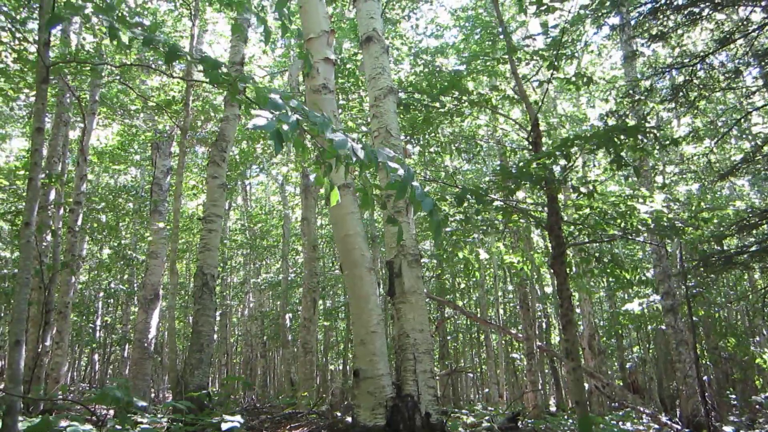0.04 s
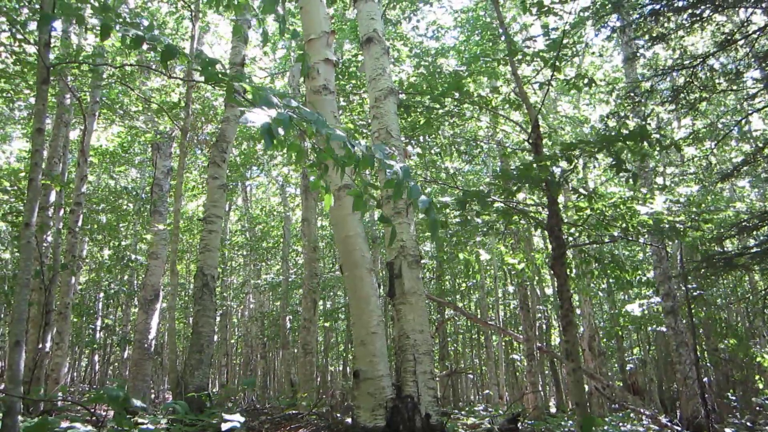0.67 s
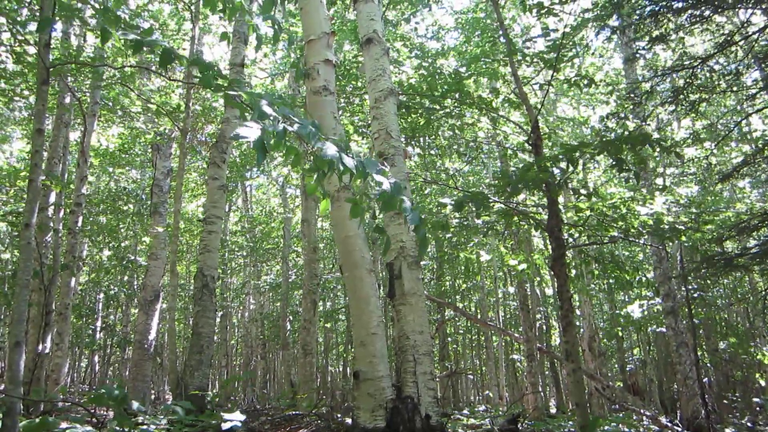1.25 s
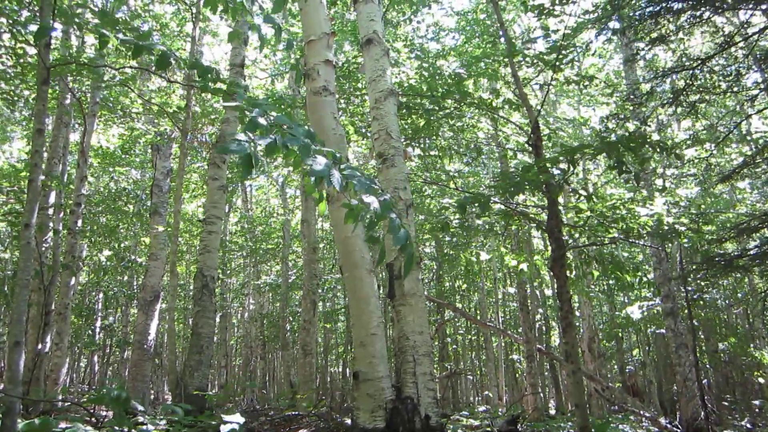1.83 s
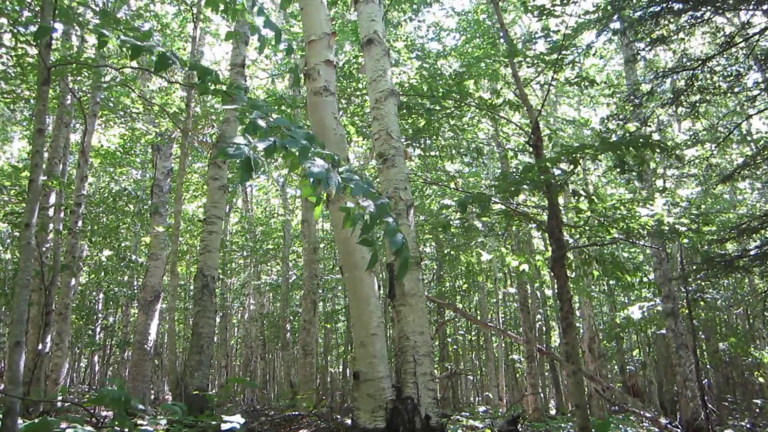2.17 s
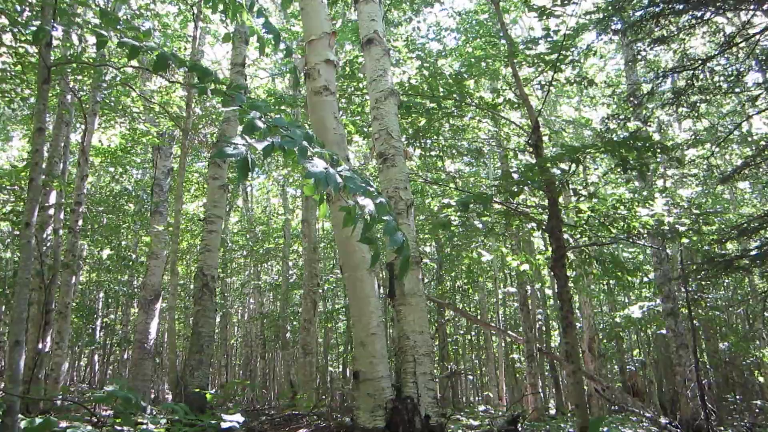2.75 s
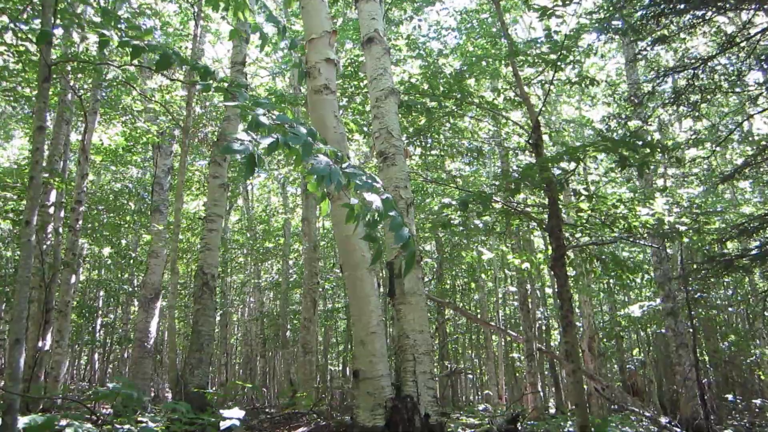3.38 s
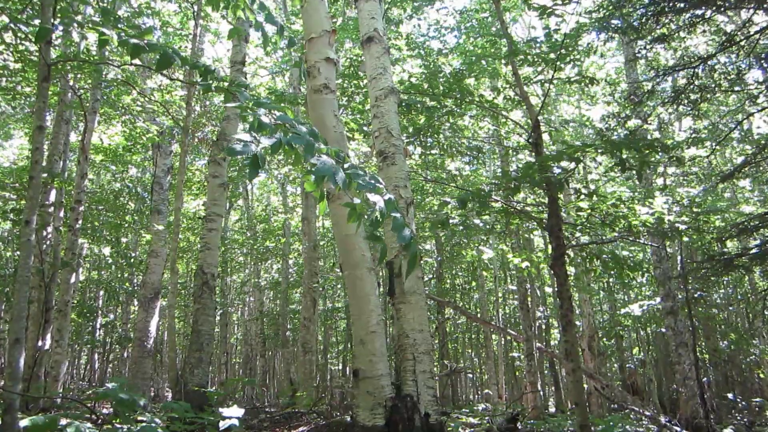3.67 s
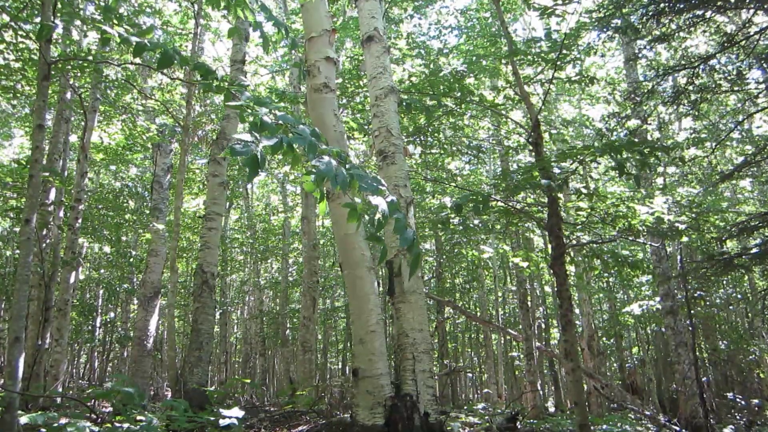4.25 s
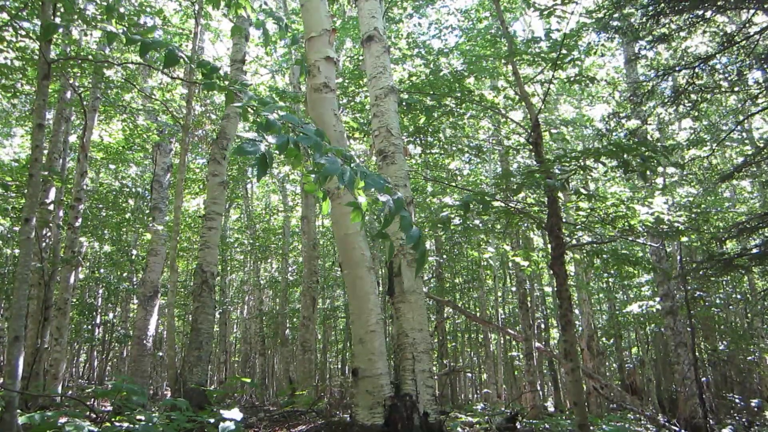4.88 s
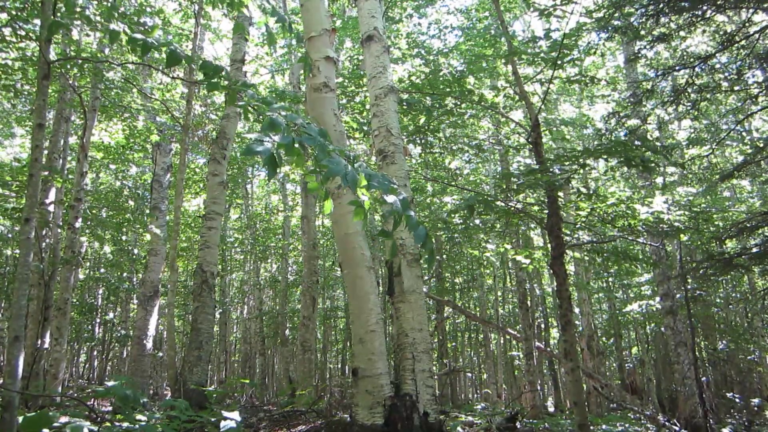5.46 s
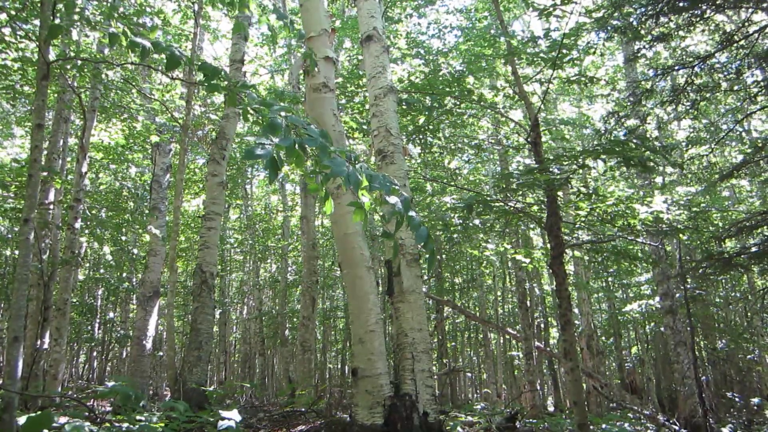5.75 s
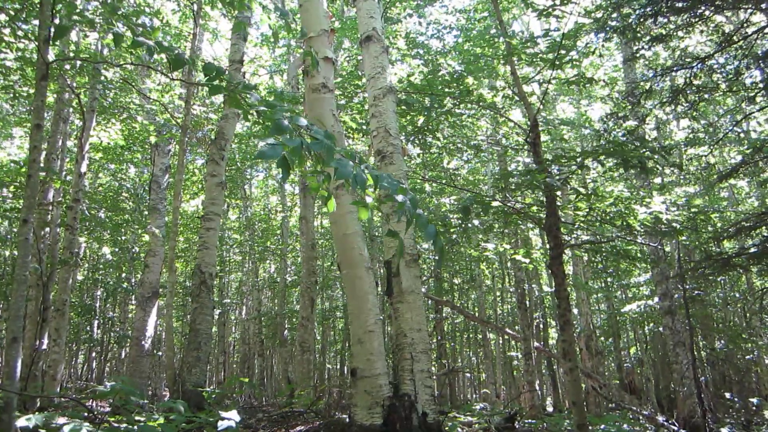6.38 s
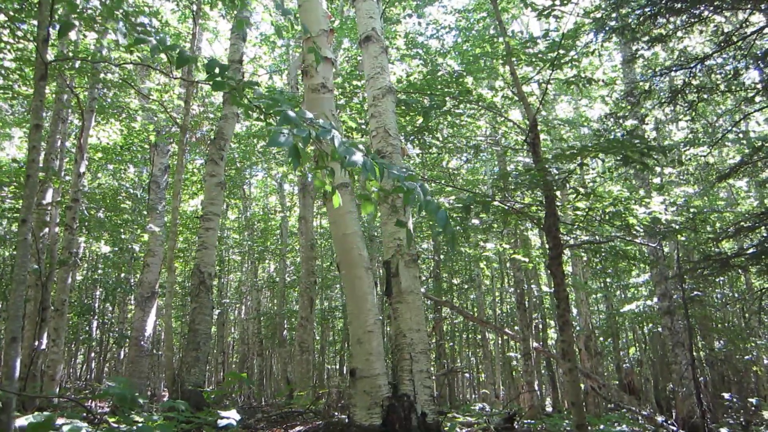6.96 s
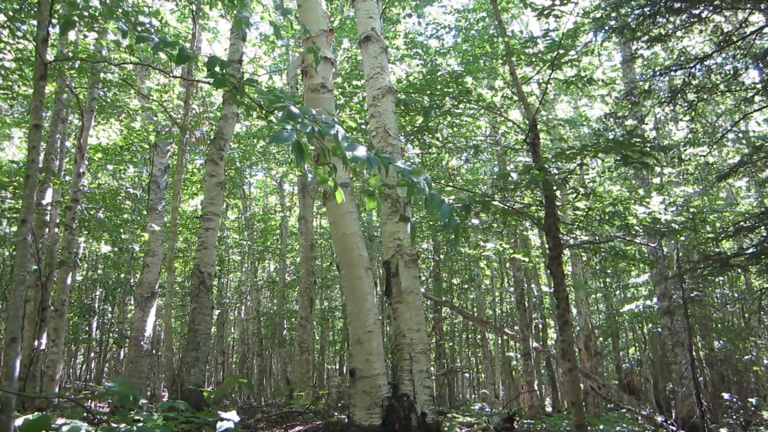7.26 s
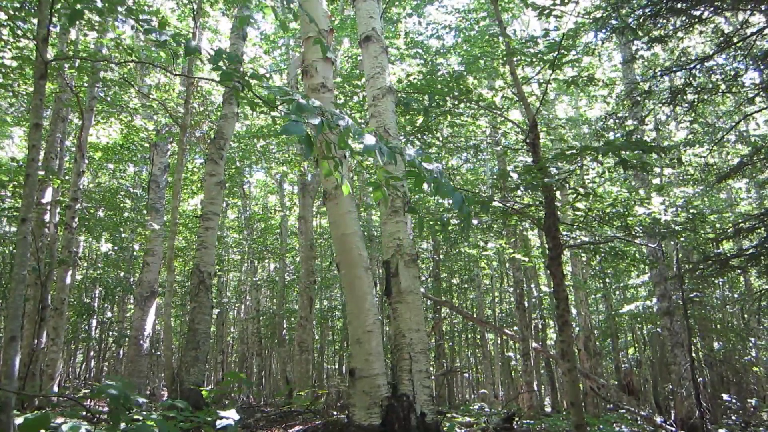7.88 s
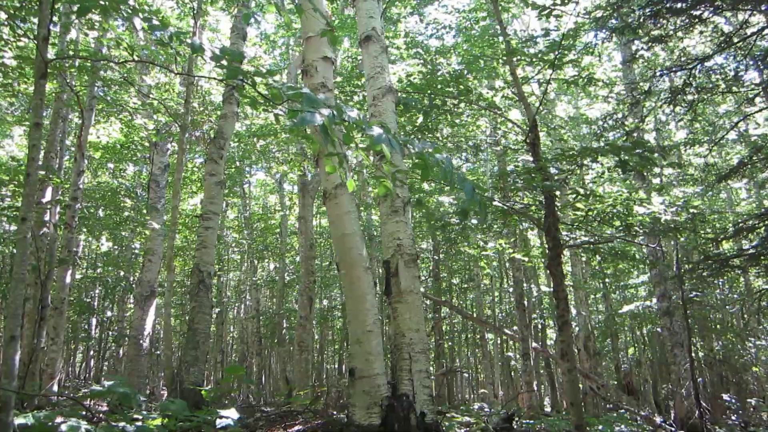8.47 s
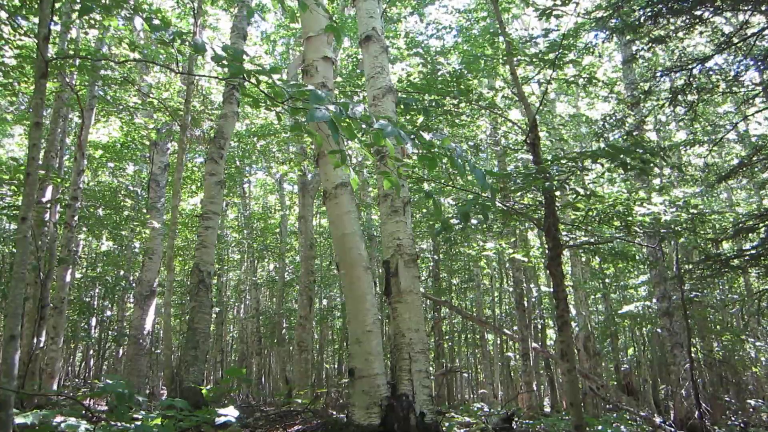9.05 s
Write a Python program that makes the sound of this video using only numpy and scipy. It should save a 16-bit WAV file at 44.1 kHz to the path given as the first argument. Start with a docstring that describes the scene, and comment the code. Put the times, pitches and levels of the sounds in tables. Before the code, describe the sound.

A gust rumbles and slaps against the microphone in a forest, easing off to leave softly rustling leaves.

```python
"""Wind in a summer birch wood

Steady leaf hiss and a faint camera whine sink as the recorder turns its gain down under a gust,
then return. For about six seconds the gust buffets the microphone: each passing eddy is a soft
pressure slap, short and hard in fast air, long and dull as the gust dies.
Two of the hardest slaps overload the input with a tick."""
import sys
import numpy as np
from scipy import signal
from scipy.fft import rfft, irfft
from scipy.io import wavfile
from scipy.ndimage import uniform_filter1d

SR = 44100
rng = np.random.default_rng(int(sys.argv[2]) if len(sys.argv) > 2 else 0)


def file_out(sig):
    """Save sig as 16-bit WAV at sys.argv[1]."""
    # one column per channel
    cols = np.atleast_2d(sig).T
    # limit, then scale
    lim = np.clip(cols, -1, 1)
    pcm = np.round(lim * 32767).astype(np.int16)
    wavfile.write(sys.argv[1], SR, pcm)


N = 406602

# base level of leaves and whine, drawn as the recorder's gain dips and returns: (time [s], level [dB])
HISS_LEVEL = [(0, -51.5), (0.33, -50.6), (0.53, -55.5), (0.8, -54), (0.9, -57), (1.25, -57.5),
              (1.55, -56.5), (2.0, -56), (2.7, -58), (3.08, -56), (3.35, -59), (3.8, -59), (4.6, -56.5),
              (5.2, -53.8), (5.55, -54.2), (6.1, -51.6), (6.6, -49), (9.22, -48.5)]


def from_db(db):
    """Decibels to gain."""
    return 10 ** (np.asarray(db) / 20)


def rms_one(x):
    """Scale to unit power."""
    return x / np.sqrt(np.mean(x ** 2) + 1e-20)


def envelopes(rows):
    """One sample-by-sample curve for each column after the time."""
    times, *columns = np.transpose(rows)
    return [np.interp(np.arange(N) / SR, times, column) for column in columns]


def cut(x, hz, kind, order=2):
    """Butterworth low- or high-pass."""
    return signal.sosfilt(signal.butter(order, hz, kind, fs=SR, output="sos"), x)


def coloured(x, spectrum):
    """Shape a white signal with an EQ curve; rms 1."""
    hz, db = np.transpose(spectrum)
    bin_hz = np.maximum(np.arange(N // 2 + 1) * SR / N, 1)
    eq_db = np.interp(np.log(bin_hz), np.log(hz), db, left=-99, right=-99)
    return rms_one(irfft(rfft(x) * from_db(eq_db), N))


def drift(per_s):
    """A wobble that glides between random values; rms 1."""
    steps = rng.standard_normal(4096)
    return rms_one(np.interp(np.arange(N) / SR * per_s, np.arange(len(steps)), steps))


def leaf_contacts(per_s, spread_db):
    """Leaves touch at random, most of them faintly; rms 1."""
    sizes = from_db(spread_db * rng.standard_normal(N)) * rng.standard_normal(N)
    return rms_one(sizes * (rng.random(N) < per_s / SR))


def forest(roar_db=2.5, rustle_db=1.5, sizzle_start_db=-8.5, sizzle_end_db=-12.6, settle_s=3.5):
    """Far crowns merge into a smooth roar; nearer leaves keep a fine grain whose sizzle slowly dulls."""
    # EQ of the far roar, the leaf rustle and its sizzle: (frequency [Hz], relative level [dB])
    roar_eq = [(20, -13), (60, -1), (150, 0), (260, 0.5), (360, -1.5), (510, 1.5), (650, -2), (900, -1.5),
               (1300, -7), (2000, -15.5), (3500, -33)]
    rustle_eq = [(500, -18), (1000, -2), (1500, -1.5), (2200, -1), (3300, -1.5), (4200, -4), (5300, -7.5),
                 (6900, -13), (9000, -27), (15000, -39.5)]
    sizzle_eq = [(3500, -12.5), (5500, 1.5), (7500, 2), (9000, -0.5), (11000, -5), (13500, -10),
                 (16000, -15)]
    hiss_db, = envelopes(HISS_LEVEL)
    sizzle_db = sizzle_end_db + (sizzle_start_db - sizzle_end_db) * np.exp(-np.arange(N) / SR / settle_s)
    fine_grain = leaf_contacts(per_s=38000, spread_db=1.5)
    coarse_grain = leaf_contacts(per_s=30000, spread_db=2.0)
    roar = from_db(roar_db) * coloured(rng.standard_normal(N), roar_eq)
    rustle = from_db(rustle_db + .38 * drift(per_s=25)) * coloured(fine_grain, rustle_eq)
    sizzle = from_db(sizzle_db + .35 * drift(per_s=40)) * coloured(coarse_grain, sizzle_eq)
    return from_db(hiss_db) * (roar + rustle + sizzle)


def bumps(rows):
    """Sum of bell-shaped swings in dB, their lengths taken at half height."""
    t = np.arange(N) / SR
    return sum(db * 2 ** -((2 * (t - s) / length) ** 2) for s, length, db in rows)


def airflow(centre_follows=.18, rumble_follows=.35):
    """The gust at the microphone: puffs make it louder and faster, lulls softer and slower."""
    # buffeting, whose centre rises with air speed: (time [s], level [dB], centre [Hz])
    gust = [(0, -35, 140.1), (0.22, -26, 165), (0.5, -18, 238.1), (1.05, -21.5, 212.1), (2.0, -21.5, 176.1),
            (2.35, -21, 189.8), (2.85, -23, 188.2), (3.45, -21.5, 220), (3.9, -23.5, 199.8),
            (4.7, -23.5, 182), (5.1, -24, 156.3), (6.05, -25.5, 143), (6.5, -35.5, 108.1),
            (6.85, -47, 68.05), (7.35, -39.5, 66), (7.8, -60, 59.9), (8.9, -61, 60), (9.22, -49.5, 71.1)]
    # rumble of the largest swirls: (time [s], level [dB])
    swirls = [(0, -30.5), (0.5, -44), (4.6, -47.5), (5.6, -39), (6.3, -35.5), (6.8, -48), (7.4, -42),
              (8.1, -59), (8.6, -59), (9.22, -46)]
    # short pushes of air: (time [s], length [s], lift [dB])
    puffs = [(0.07, 0.052, 4), (0.94, 0.0797, 2.5), (1.41, 0.092, 4), (2.04, 0.0602, 2), (2.76, 0.03993, 5),
             (5.03, 0.042, 4), (5.31, 0.081, 6), (6.25, 0.051, 3.5), (6.6, 0.0907, 9), (7.29, 0.063, 10),
             (7.59, 0.038, 13), (9.15, 0.046, 10.5)]
    # moments of slack air: (time [s], length [s], depth [dB])
    lulls = [(0.635, .06, 8), (0.745, .11, 11), (1.28, 0.064, 4), (1.8, .15, 10), (2.13, 0.041, 5),
             (2.52, .06, 5), (2.69, 0.079, 11), (2.83, 0.037, 6), (4.55, 0.061, 8), (4.96, 0.083, 8),
             (5.09, .05, 8.5), (5.22, .06, 5.5), (5.46, 0.05004, 5), (6.16, .08, 8), (6.42, 0.1003, 5),
             (6.69, 0.055, 8), (7.51, 0.059, 8)]
    level_db, centre_hz = envelopes(gust)
    rumble_db, = envelopes(swirls)
    swing_db = bumps(puffs) - bumps(lulls)
    speed_ratio = from_db(centre_follows * swing_db)
    return level_db + swing_db, centre_hz * speed_ratio, rumble_db + rumble_follows * swing_db


def eddies(times, sizes, widths, leans, order, halo=3.05):
    """Passing vortices: a push ahead, suction in the core, a broad overpressure around it."""
    pressure = np.zeros(N)
    for s, size, width, lean in zip(times, sizes, widths, leans):
        span = np.arange(max(int((s - 12 * width) * SR), 0), min(int((s + 12 * width) * SR), N))
        offset = (span / SR - s) / width
        fade = np.cos(offset * np.pi / 24) ** 2
        # a higher order rounds the core into a bell, so the top end falls more steeply
        core, around = (1 + np.array([offset, offset / halo]) ** 2 / order) ** (-2 * order)
        # the overpressure balances the suction, so little deep bass is left
        pulse = around / halo - (1 + lean * offset) * core
        pressure[span] += size * fade * pulse / np.hypot(.7, lean / 2.6)
    return pressure


def buffeting(level_db, centre_hz, per_cycle=1.3, width_cycles=.33, spread_db=4.0, count=4000):
    """Faster air brings more and shorter eddies; the microphone port leaks their slowest part."""
    width_draw, size_draw, lean_draw = np.clip(rng.standard_normal((count, 3)), -1.8, 1.8).T
    passed = np.cumsum(per_cycle * centre_hz) / SR   # eddies carried past so far
    places = np.cumsum(rng.gamma(2, .5, count))
    times = np.interp(places, passed, np.arange(N) / SR, right=N / SR + 1)
    widths = width_cycles / np.interp(places, passed, centre_hz) * np.exp(.37 * width_draw)
    sizes = from_db(spread_db * size_draw)
    leans = 1.35 + 1.28 * lean_draw
    air = cut(eddies(times, sizes, widths, leans, order=4), hz=24, kind="high")
    running_power = uniform_filter1d(uniform_filter1d(air ** 2, size=2000), size=1200)
    return from_db(level_db) * air / np.sqrt(running_power + 1e-6)


def slaps(duck_depth=.75, port_hz=25):
    """The hardest eddies, and a gain that ducks the rest of the gust around each one."""
    # eddies hitting the microphone: (time [s], level [dB], half width [s])
    hits = [(0.055, -12.5, 0.0018), (0.1372, -12.5, 0.0021), (0.1983, -10, 0.0025), (0.2295, -7, .0015),
            (0.2491, -8, .0013), (0.2948, -8, 0.00091), (0.3301, -4.5, 0.0012), (0.401, -6.5, .0011),
            (0.432, -9.5, .0009), (0.465, -3.5, .00095), (0.5275, -3, 0.0011), (0.677, -3, .0012),
            (0.816, -2.5, .0013), (0.8389, -6.5, 0.0013), (0.9155, -11, 0.00072), (0.9424, -5.5, 0.0012),
            (0.9584, -8.5, 0.00088), (1.0655, -4.5, 0.00095), (1.1389, -7, 0.00088), (1.1626, -4, 0.0016),
            (1.3841, -4, 0.0011), (1.477, -8, .001), (1.5659, -8, 0.0015), (1.6762, -4, .0012),
            (1.8926, -9.5, 0.0019), (2.0263, -3.5, .0012), (2.079, -4, .0017), (2.2446, -7, 0.00097),
            (2.407, -8.5, 0.0011), (2.485, -11.5, 0.00096), (2.5074, -7.5, 0.0015), (2.6147, -12.5, .0011),
            (2.7864, -14, .001), (3.0178, -10, .0011), (3.116, -8.5, 0.00091), (3.2005, -8, .0012),
            (3.3124, -6.5, 0.00096), (3.4291, -9, .0008), (3.4553, -15.5, 0.00062), (3.523, -8, .0008),
            (3.6224, -6, 0.00095), (3.714, -10, 0.00089), (3.8691, -13, .00085), (3.9121, -13, .00084),
            (4.1211, -7.5, .0012), (4.3036, -7, .0012), (5.2837, -8, 0.0014), (5.298, -8, .0011),
            (5.3219, -7, .0013), (5.4103, -9, .0013), (5.9235, -15, 0.0013), (5.957, -14.5, .0012),
            (6.24, -14, .0022), (6.6329, -20.5, 0.0025), (7.2869, -19.5, 0.0027)]
    times, level_db, widths = np.transpose(hits)
    air = eddies(times, from_db(level_db), widths, leans=np.full(len(times), 2), order=1)
    nearness = np.zeros(N)
    for s, width in zip(times, widths):
        span = np.arange(int((s - 10 * width) * SR), int((s + 10 * width) * SR))
        nearness[span] += np.exp(-((span / SR - s) / (4 * width)) ** 2)
    return cut(air, port_hz, "high", order=1), np.clip(1 - duck_depth * nearness, 0, 1)


def microphone_wind():
    """Buffeting and slaps ride on the slow rumble of the largest swirls."""
    # EQ of the rumble: (frequency [Hz], relative level [dB])
    rumble_eq = [(10, -13), (20, -10.5), (32, -7), (48, -3), (70, -6.5), (100, -16), (160, -29)]
    level_db, centre_hz, rumble_db = airflow()
    hard_slaps, duck = slaps()
    rumble = from_db(rumble_db) * coloured(rng.standard_normal(N), rumble_eq)
    return hard_slaps + duck * (buffeting(level_db, centre_hz) + rumble)


def camera_whine():
    """Two thin, steady pitches that sink and return with the hiss."""
    # tones of the whine: (frequency [Hz], level relative to HISS_LEVEL [dB])
    tones = [(7852, -33.5), (13048, -44.5)]
    hiss_db, = envelopes(HISS_LEVEL)
    t = np.arange(N) / SR
    return sum(from_db(db + hiss_db) * np.sqrt(2) * np.sin(2 * np.pi * hz * t) for hz, db in tones)


def overload_ticks():
    """The input overloads on two hard slaps: each a sharp spike with a duller snap for body."""
    # the bare spikes: (time [s], level [dB])
    ticks = [(0.6776, -26), (0.8166, -29.5)]
    spikes = np.zeros(N)
    for s, db in ticks:
        spikes[round(s * SR)] = from_db(db)
    snap = from_db(10) * cut(spikes, 2500, "low")
    return spikes + snap


def scene():
    """The wood, the gust on the microphone, the whine and the ticks, in mono."""
    return (forest() + microphone_wind() + camera_whine() + overload_ticks())[None]


def record(dry, ceiling=.71, cutoff_hz=16400):
    """The input flattens the highest peaks, then a steep low-pass takes off the very top."""
    limited = dry / (1 + (dry / ceiling) ** 14) ** (1 / 14)
    return signal.sosfilt(signal.cheby2(14, 50, cutoff_hz, fs=SR, output="sos"), limited)


dry = scene()
out = record(dry)
file_out(out)
```